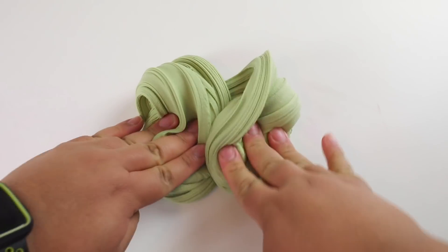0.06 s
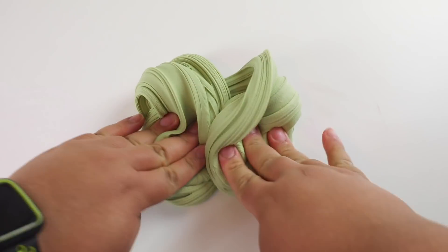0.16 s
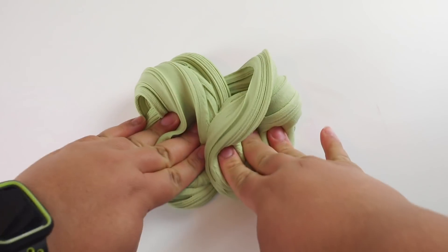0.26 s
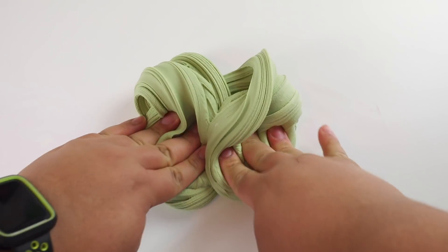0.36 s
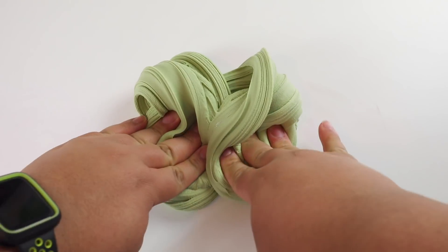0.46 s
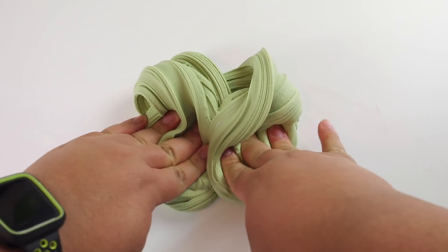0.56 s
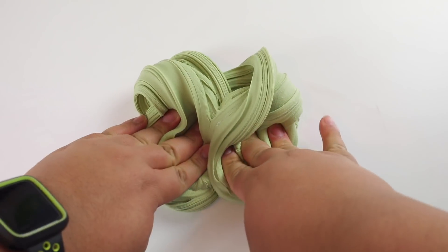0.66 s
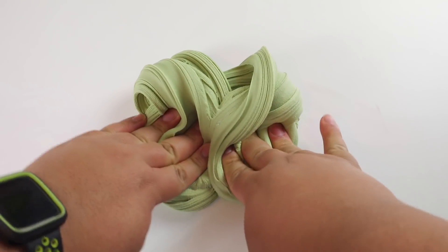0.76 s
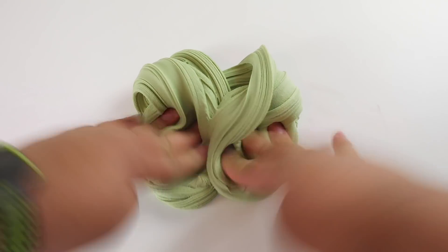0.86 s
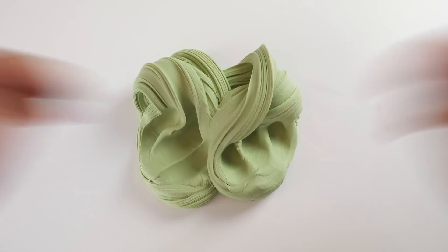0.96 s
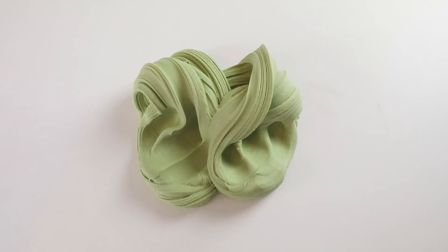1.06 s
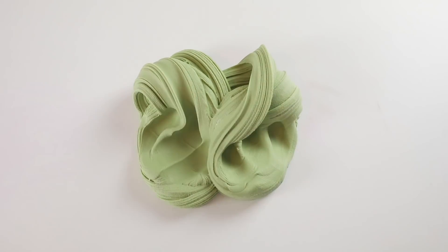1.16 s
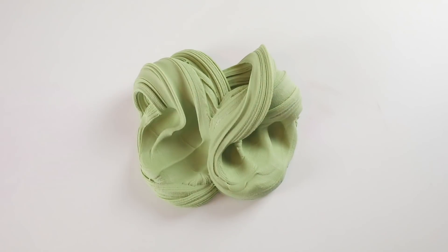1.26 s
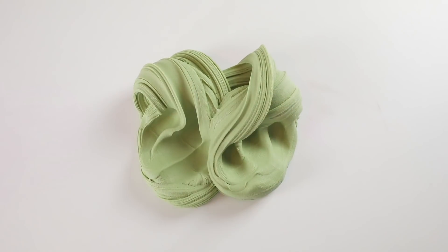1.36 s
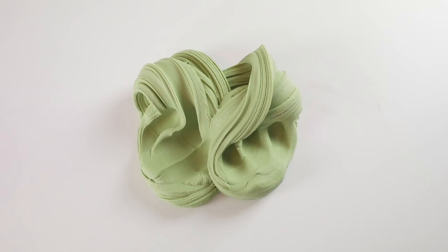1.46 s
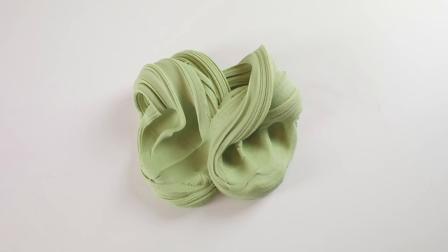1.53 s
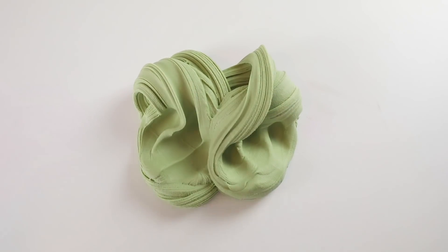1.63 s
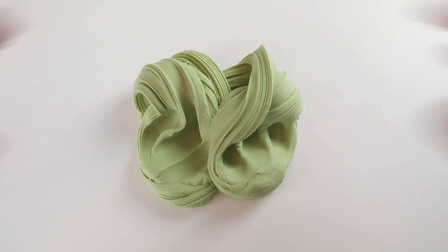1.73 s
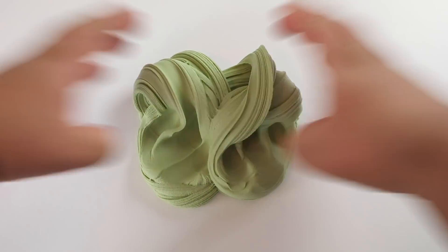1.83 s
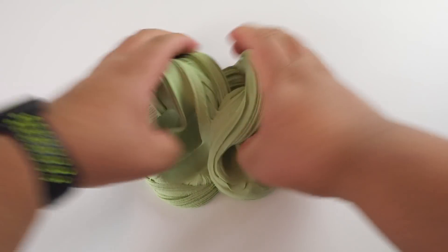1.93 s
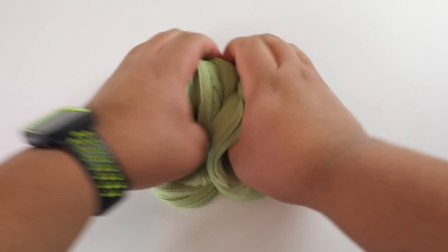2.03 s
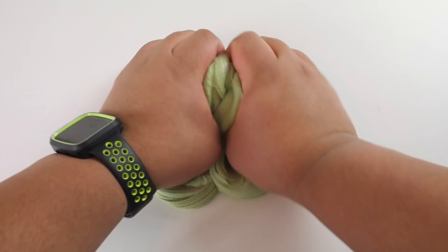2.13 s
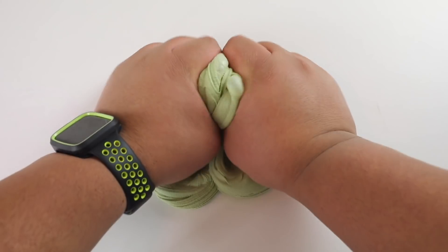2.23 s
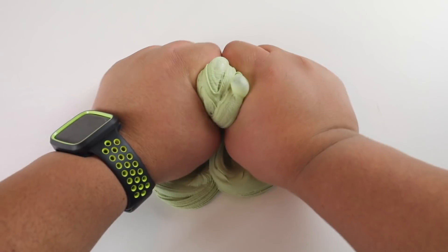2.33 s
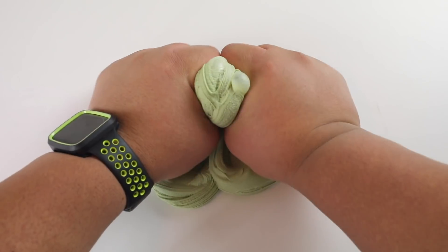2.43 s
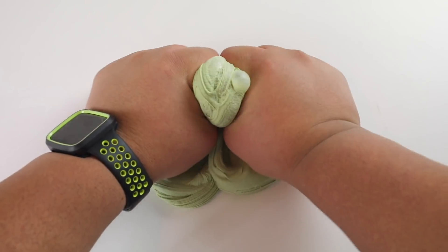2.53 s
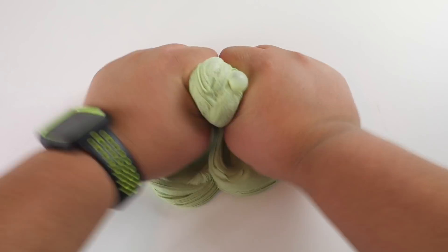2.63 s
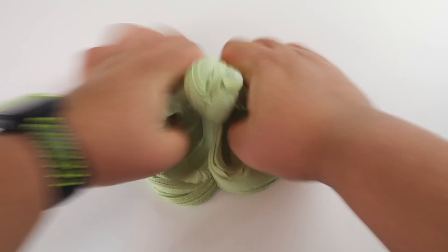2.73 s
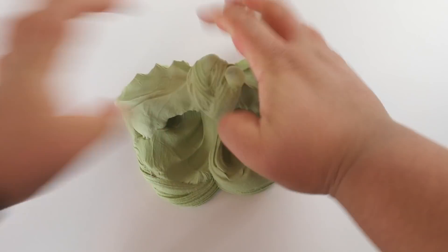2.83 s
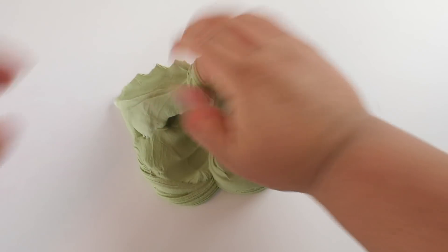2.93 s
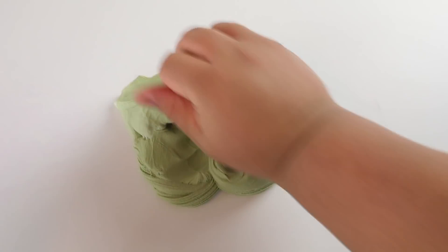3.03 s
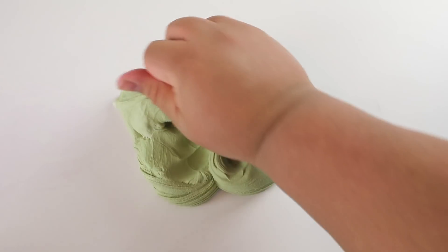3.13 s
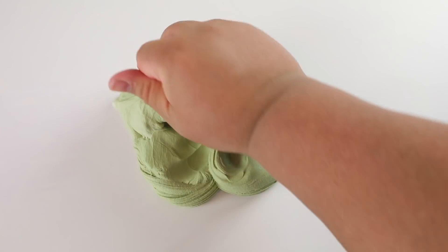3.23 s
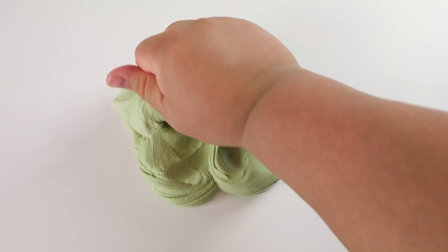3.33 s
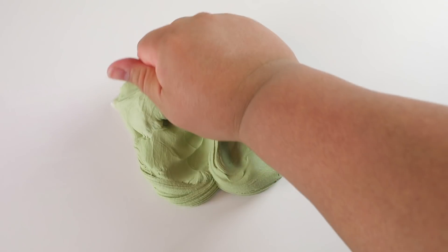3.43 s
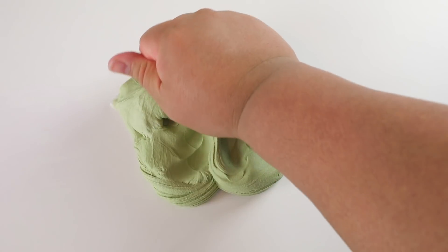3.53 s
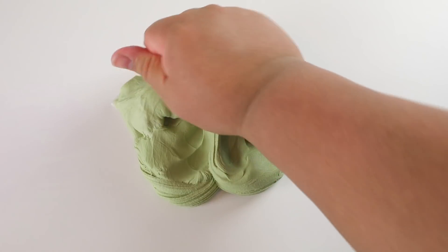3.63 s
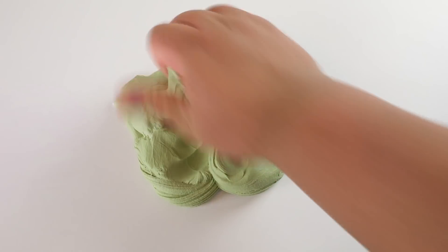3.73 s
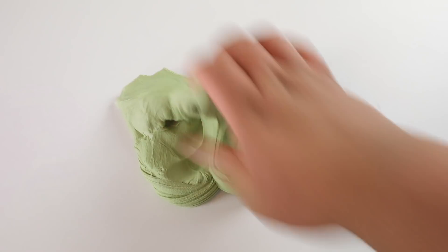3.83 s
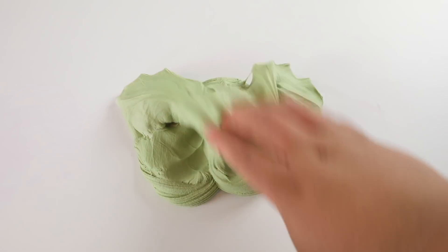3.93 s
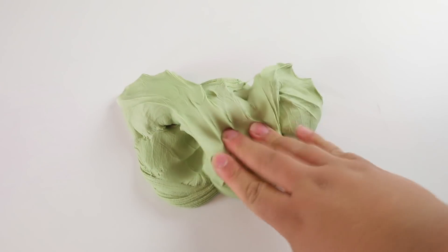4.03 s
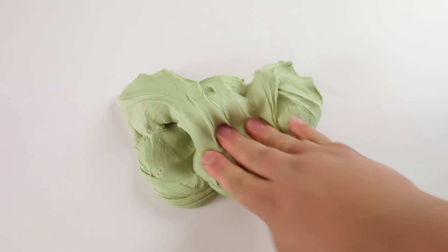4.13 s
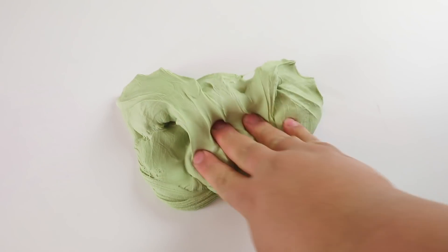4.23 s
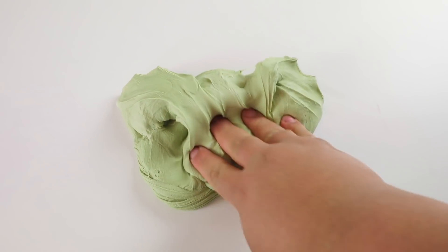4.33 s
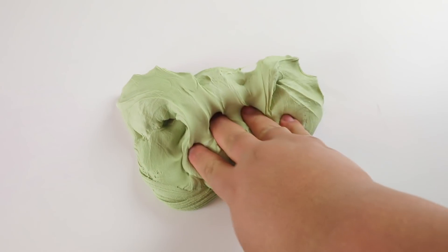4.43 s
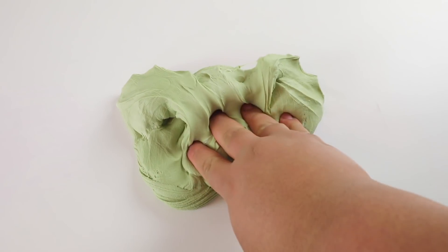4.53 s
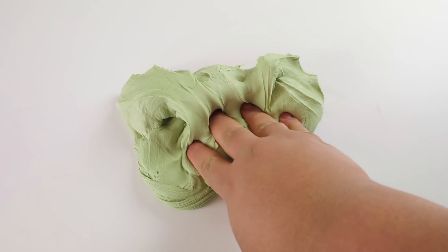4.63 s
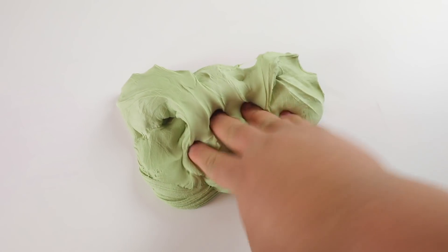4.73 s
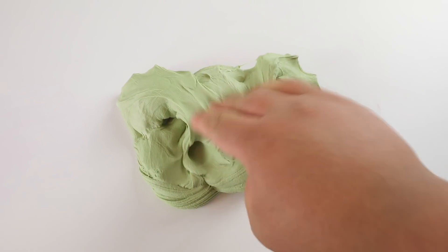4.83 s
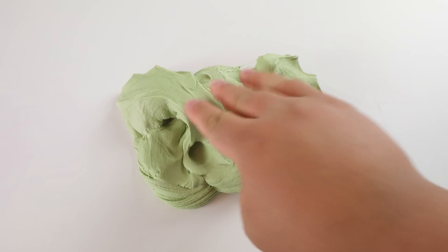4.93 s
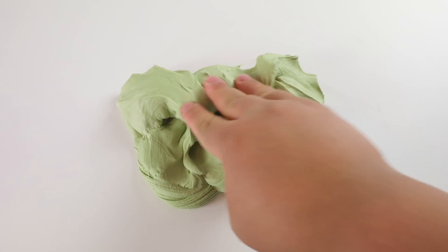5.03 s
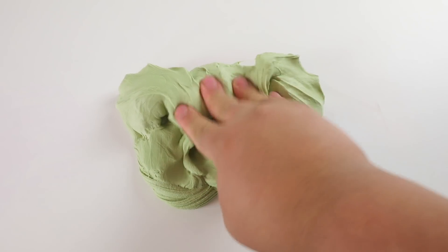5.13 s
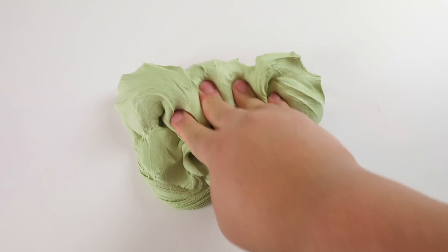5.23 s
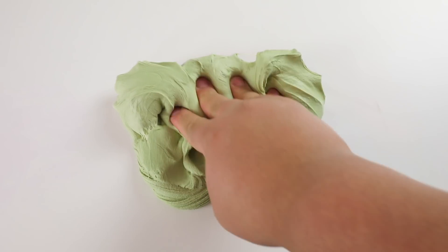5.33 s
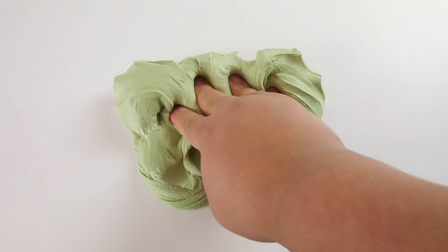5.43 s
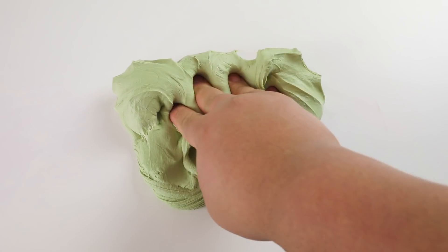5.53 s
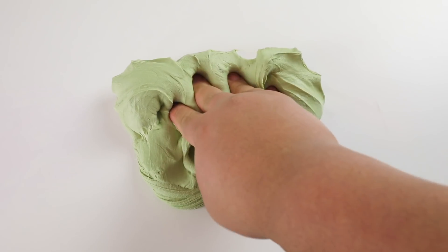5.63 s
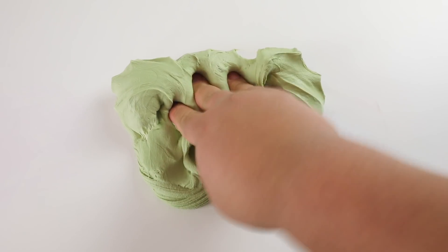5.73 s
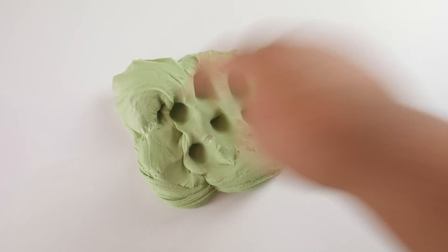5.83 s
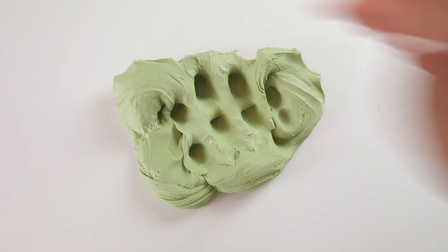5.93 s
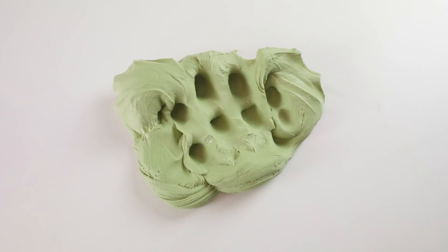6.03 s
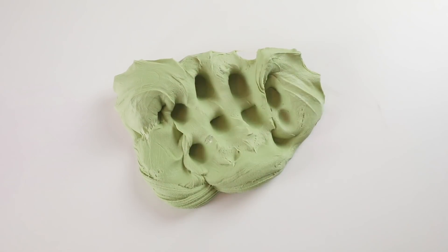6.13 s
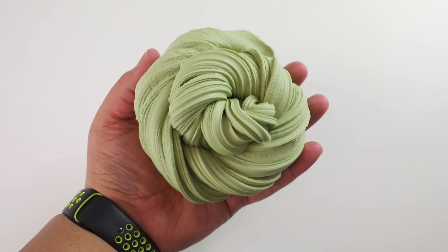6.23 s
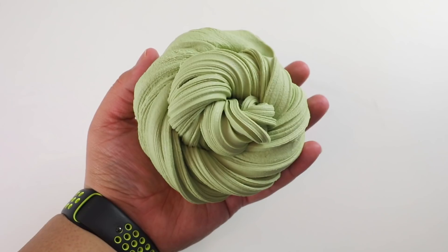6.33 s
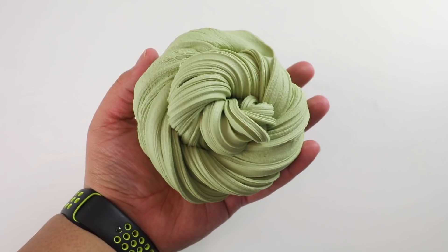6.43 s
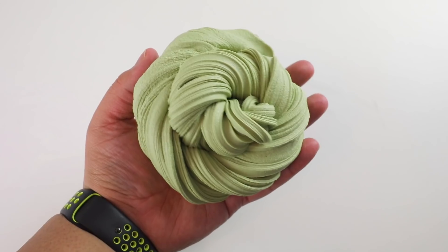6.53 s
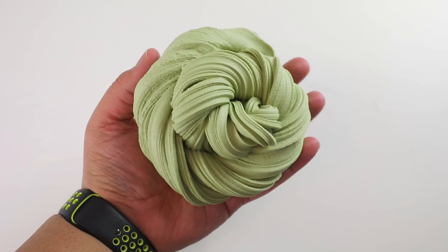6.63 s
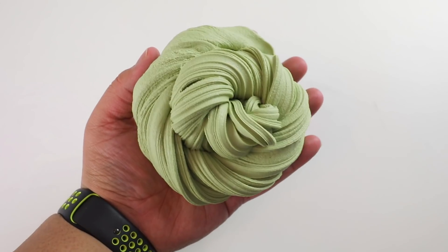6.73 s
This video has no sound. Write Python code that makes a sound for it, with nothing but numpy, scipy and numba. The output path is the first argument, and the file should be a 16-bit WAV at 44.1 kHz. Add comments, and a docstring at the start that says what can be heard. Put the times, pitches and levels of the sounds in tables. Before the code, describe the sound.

Soft slime is handled on a table, miked closely with little echo. Small bright snaps and one loud hollow pop open, followed by a crisp peel with a soft table thud. After silence comes the busiest crackling and popping squeeze, a ripping release, then a second burst of pops. Gentle pressing leaves isolated ticks and two short tacky peels before only low hum and very faint hiss remain.

```python
"""Soft slime pressed, squeezed and peeled on a table by hands, close to one microphone in a small quiet room.
Air pockets burst as damped, mostly up-gliding sines; sticky films tear as swarms of tiny bursts (crackle,
fizz). The table rumbles on jolts: resonant noise. A short noise-built echo tail gives the room, shaped noise
the low hum and a faint hiss that differs between the channels."""
import sys
import numpy as np
from scipy import signal
from scipy.fft import rfft, irfft, next_fast_len
from scipy.io import wavfile
from scipy.ndimage import uniform_filter1d
from numba import njit

SR = 44100
rng = np.random.default_rng(int(sys.argv[2]) if len(sys.argv) > 2 else 0)


def dump_mix(stems):
    """Bounce the given channels to the path in sys.argv[1] as a 16-bit WAV at rate SR."""
    frames = np.atleast_2d(stems).T  # one column per channel
    limited = np.clip(frames, -1, 1)  # hard clip at full scale
    pcm = np.round(limited * 32767).astype(np.int16)
    wavfile.write(sys.argv[1], SR, pcm)


N = 298557


def undb(db):
    """dB to amplitude ratio."""
    return 10 ** (np.asarray(db) / 20)


def unit(x):
    """Scale to rms 1."""
    return x / np.sqrt(np.mean(x ** 2))


def above(x, cutoff_hz):
    """High-pass: the smaller the burst, the less bass it radiates."""
    return signal.sosfilt(signal.butter(2, cutoff_hz, "high", fs=SR, output="sos"), x)


def colour(x, points):
    """Shape the spectrum by (f/Hz, level/dB) points joined on a log-frequency axis."""
    point_hz, point_db = np.transpose(points)
    n = next_fast_len(len(x))
    f_hz = np.arange(n // 2 + 1) * SR / n + 1  # +1 avoids log(0)
    response = undb(np.interp(np.log(f_hz), np.log(point_hz), point_db))
    return irfft(rfft(x, n) * response, n)[:len(x)]


@njit
def grains(n, start, f_hz, q, size, glide, rise_cycles):
    """Damped sines swelling over rise_cycles; a venting pocket shrinks, so glide > 0 raises the pitch."""
    out = np.zeros(n + 2048)
    for k in range(len(start)):
        # height of the first swing
        crest = np.exp(-np.pi / (4 * q[k])) * (1 - np.exp(-.25 / rise_cycles))
        i = int(start[k])
        amp = size[k] / crest
        w = 2 * np.pi * f_hz[k] / SR
        phase = w * (1 - (start[k] - i))  # sub-sample onset
        for j in range(1, 2000):
            swell = 1 - np.exp(-phase / (2 * np.pi * rise_cycles))
            out[i + j] += amp * np.sin(phase) * swell
            phase += w
            amp *= np.exp(-w / (2 * q[k]))
            w = min(w * (1 + glide * w / (2 * np.pi)), 2.6)
            if abs(amp) < abs(size[k]) * .003:
                break
    return out[:n]


def swarm(per_s, pitches, q, spread_db, count):
    """Tiny bursts at random times, pitches and signs, a few louder than the rest; rms 1."""
    gap_draw, kind_draw, size_draw, sign_draw = rng.random((count, 4)).T
    bend = rng.standard_normal(count)
    start = np.cumsum(-np.log(1 - gap_draw)) / per_s * SR
    keep = start < N
    centre_hz, log_spread, share = np.transpose(pitches)
    kind = np.searchsorted(np.cumsum(share) / np.sum(share), kind_draw)
    f_hz = np.clip(centre_hz[kind] * np.exp(log_spread[kind] * bend), 300, 16000)
    excess_db = spread_db * np.minimum(-np.log(1 - size_draw), 5)
    size = undb(excess_db) * np.sign(sign_draw - .5)
    return unit(grains(N, start[keep], f_hz[keep], np.full(keep.sum(), q), size[keep], 0.034, 0.27))


FIZZ_LEAD = 0.13  # films tear first: fizz peaks this share of the swell earlier


def gains(rows, start_db, end_db):
    """Crackle and fizz gain: movements swell towards the hardest moment, slacken, and are gated at both ends."""
    out, t = np.zeros((2, N)), np.arange(N) / SR
    for start, peak, end, crackle_db, fizz_db in rows:
        gate = np.clip(np.minimum(t - start, end - t) / .006 + .5, 0, 1)  # 6 ms ramps
        fizz_peak = peak - FIZZ_LEAD * (peak - start)
        for k, (crest, db) in enumerate([(peak, crackle_db), (fizz_peak, fizz_db)]):
            swell_db = np.interp(t, [start, crest, end], [start_db, 0, end_db])
            out[k] += gate * undb(db + swell_db)
    return out


def slips(rate_hz, depth_db):
    """The tear sticks and lets go: random levels held 1 / rate_hz and slewed; rms 1."""
    hold = int(SR / rate_hz)
    steps = np.repeat(rng.standard_normal(N // hold + 1), hold)
    return unit(undb(depth_db * uniform_filter1d(steps, hold)[:N]))


# crackle pitches of the larger strands: f/Hz, spread/log pitch, share/1
STRAND_PITCHES = [(1350, 0.55, .5), (2415, 0.12, .2), (4270, 0.06, .3)]
# fizz pitches of the thinnest films: f/Hz, spread/log pitch, share/1 (relative)
FILM_PITCHES = [(7200, .2, 0.35), (12500, 0.32, 0.69)]


def tearing(gain, per_s, spread_db, slip_db):
    """Larger strands crackle in the middle range, the thinnest films fizz."""
    crackle_gain, fizz_gain = gain * slips(170., slip_db)
    crackle = swarm(per_s, STRAND_PITCHES, 1.0, spread_db, count=60000)
    fizz = swarm(2.8 * per_s, FILM_PITCHES, 1.2, spread_db, count=120000)
    return crackle_gain * crackle + fizz_gain * fizz


# hum spectrum: f/Hz, relative density/dB per Hz
HUM_SPECTRUM = [(12, -30), (20, -3.5), (43, -8), (114, -1), (165, -3.5), (273, -4.5), (393, -14),
                (452, -15.5), (888, -24), (1280, -29.5), (1470, -29), (2120, -36), (15200, -46.5),
                (16500, -57.5)]
HUM_RMS_DB = -50.5


def hum():
    """Steady low rumble of the building: noise thinning towards the treble."""
    return undb(HUM_RMS_DB) * unit(colour(rng.standard_normal(N), HUM_SPECTRUM))


# hiss spectrum: f/Hz, relative density/dB per Hz
HISS_SPECTRUM = [(1470, -32.5), (2500, -6.5), (5160, -1.5), (13100, -2.5), (15500, -2.5)]
HISS_RMS_DB = -78


def hiss():
    """Steady faint noise, weak in the bass."""
    return undb(HISS_RMS_DB) * unit(colour(rng.standard_normal(N), HISS_SPECTRUM))


# slow kneading movements: start t/s, hardest t/s, end t/s, crackle level/dB, fizz level/dB
KNEAD_MOVES = [(0, .13, 0.23, -61.5, -63.5), (.18, .25, .33, -63, -58.5), (.33, .37, 0.42, -63, -68),
               (1.968, 1.98, 2.08, -53, -70), (2.0, 2.05, 2.12, -57, -64), (2.08, 2.23, 2.344, -44, -51),
               (2.33, 2.414, 2.51, -47, -45.5), (2.5, 2.54, 2.73, -59, -56.5),
               (3.12, 3.2, 3.25, -54, -62.5), (3.21, 3.29, 3.346, -51, -46.5),
               (3.335, 3.39, 3.44, -57, -53), (3.43, 3.47, 3.56, -65, -62.5), (3.59, 3.63, 3.72, -69, -64),
               (4.03, 4.07, 4.17, -67.5, -68), (4.17, 4.3, 4.42, -68, -67), (5.15, 5.28, 5.3, -70, -61.5),
               (5.44, 5.48, 5.9, -78, -75.5), (6.3, 6.43, 6.3, -68.5, -79.5)]
KNEAD_START_DB, KNEAD_END_DB = -14, -9.5  # re hardest moment


def knead_gains():
    """Crackle and fizz gain of the slow squeezes."""
    return gains(KNEAD_MOVES, KNEAD_START_DB, KNEAD_END_DB)


def knead(gain):
    """Squeezed slime tears its films at a moderate burst rate."""
    return tearing(gain, per_s=2000., spread_db=3.4, slip_db=2.5)


# stray burst pitches: f/Hz, spread/log pitch, share/1
TICK_PITCHES = [(3300, .3, .5), (8500, .35, .5)]
TICKS_PER_S, TICKS_RE_FIZZ_DB = 49, -2.5


def ticks(fizz_gain):
    """Sparse stray bursts that follow the kneading fizz gain."""
    return undb(TICKS_RE_FIZZ_DB) * fizz_gain * swarm(TICKS_PER_S, TICK_PITCHES, 2.5, 1.3, count=1000)


# echo bands, an octave each: centre f/Hz, decay t60/s, level/dB re dry
ROOM_BANDS = [(326.2, .3, -21), (700, 0.17, -27), (1383, 0.24, -24), (2770, 0.27, -23), (5300, .22, -19),
              (11000, 0.16, -20)]
NEAR_T60_S, NEAR_DB = 0.013, -11  # table and hands scatter at once
WALL_S, WALL_DB = 0.013, -24.5  # the nearest wall answers later
EARLY_SHARE = .55  # tail amplitude before the wall answers


def room(dry):
    """Close scatter, one wall echo, then noise bands that each decay at their own rate."""
    t = np.arange(SR // 2) / SR
    near_fade = np.exp(-np.log(1000) * t / NEAR_T60_S) * np.clip(t / 0.0045, 0, 1)
    near = rng.standard_normal(len(t)) * near_fade
    tail = undb(NEAR_DB) * near / np.sqrt(np.sum(near ** 2))
    tail[int(WALL_S * SR)] += undb(WALL_DB)
    build = np.where(t < WALL_S, EARLY_SHARE * np.clip(t / .003, 0, 1), 1)
    for f_hz, t60_s, db in ROOM_BANDS:
        edges_hz = [f_hz / np.sqrt(2), f_hz * np.sqrt(2)]
        octave = signal.butter(2, edges_hz, "band", fs=SR, output="sos")
        band = signal.sosfilt(octave, rng.standard_normal(len(t)))
        echo = unit(band) * np.exp(-np.log(1000) * t / t60_s) * build
        tail = tail + undb(db) * echo / np.sqrt(np.sum(echo ** 2))
    return signal.fftconvolve(dry, tail)[:N]


# bursting air pockets: t/s, hollow level/dB, hollow f/Hz, pocket level/dB, pocket f/Hz,
# film level/dB, sharpness Q/1 (hollow and pocket)
POP_EVENTS = [(.0849, -44.5, 2100, -43, 5000, -36, 3.3), (.1125, -50, 4000, -38, 7500, -50, 2),
              (.1214, -31, 4440, -17, 7160, -44, 1.5), (0.1384, -47, 990, -46, 3400, -55, 4.4),
              (0.2435, -46, 580, -34, 3920, -41, 2.6), (.253, -60, 1100, -45, 4000, -22, 1.5),
              (.2664, -56, 1900, -47, 3800, -56, 2.8), (0.288, -45.5, 1300, -43.5, 2620, -60, 3.8),
              (.307, -57, 3950, -38.5, 7700, -55, 2), (0.4209, -8, 960, -25, 3300, -22.5, 1.25),
              (0.4233, -20.5, 960, -34, 2420, -48, 6.4), (0.48, -52, 970, -37, 2100, -66, 1.9),
              (.573, -55, 929, -48.5, 2104, -72, 1.35), (.959, -45, 1500, -22, 4000, -19, 5),
              (0.9635, -21, 1110, -18.5, 2100, -28, 1.5), (.9808, -26.5, 955, -46, 3300, -48, 3.6),
              (1.9772, -39, 1550, -41, 2550, -60, 4.5), (2.0231, -53, 1010, -44, 4050, -66, 2.9),
              (2.031, -45, 675, -44, 4500, -39, 3.9), (2.0462, -53, 1800, -33, 3930, -32, 3.4),
              (2.123, -48, 3700, -40, 6700, -50, 3), (2.1473, -43, 2200, -33, 8300, -45, 2.3),
              (2.1602, -59, 1200, -38, 2800, -27, 2.8), (2.1702, -56, 1000, -27.5, 4900, -22.5, 3.7),
              (2.2, -34, 1600, -22, 5000, -38, 2.2), (2.2109, -27.5, 2880, -30, 7200, -45, 3.2),
              (2.2187, -30, 1610, -31, 3200, -48, 2.4), (2.2253, -47, 1900, -20.5, 4760, -18.5, 3.4),
              (2.2382, -44, 1800, -29, 4100, -25, 4.7), (2.259, -27, 1100, -36, 9000, -52, 1.6),
              (2.2654, -26, 1210, -26, 3500, -26, 3.4), (2.2845, -31, 1800, -44, 3297, -27.5, 5),
              (2.3169, -30.5, 1000, -33.5, 3970, -41, 3.2), (2.322, -30, 1580, -46.5, 3300, -66, 4.1),
              (2.3302, -41, 1100, -36, 4100, -51, 2.8), (2.357, -29, 1400, -26.5, 4000, -25, 2.4),
              (2.368, -31, 1100, -32, 4700, -54, 2.3), (2.3779, -25, 1190, -29, 3300, -41, 2.7),
              (2.3835, -22.5, 1600, -21, 4200, -22, 3.7), (2.404, -10.5, 1250, -8, 3700, -7.5, 0.99),
              (2.4247, -25.5, 1640, -38.5, 3300, -47, 2.2), (2.4609, -61, 1200, -37, 3650, -24, 3),
              (2.4886, -45, 4000, -39, 7100, -45, 2.5), (2.5086, -17.5, 1650, -19, 3300, -25, 2.4),
              (2.5164, -20.5, 1570, -43, 3300, -16, 2.5), (2.525, -16.5, 1300, -3, 3920, -41, 3.1),
              (2.5282, -51, 1900, -18.5, 6200, -36, 3.1), (2.625, -58, 1200, -33.5, 3770, -41, 2.5),
              (2.6443, -45.5, 1700, -42, 3600, -39, 3.5), (2.67, -66, 624, -38.5, 4190, -69, 3.7),
              (2.726, -29.5, 1470, -31, 3200, -45, 3.7), (2.7592, -35, 1200, -22, 3930, -35, 2.8),
              (2.7777, -29, 1230, -39, 3320, -53, 7.4), (3.1353, -66, 510, -53, 4870, -43, 3.8),
              (3.1441, -14.5, 1250, -20, 2600, -39, 0.75), (3.152, -51, 1511, -54, 2300, -36, 3.1),
              (3.187, -50, 1300, -55, 6100, -45, 3.7), (3.1995, -51, 4000, -47, 6600, -60, 1.9),
              (3.2155, -43, 1300, -49, 3300, -48, 1.6), (3.2254, -41, 1200, -34, 2300, -56, 2.2),
              (3.2313, -38, 1700, -25, 2240, -47, 2.1), (3.2377, -14, 1080, -7.5, 4070, -19, 1.2),
              (3.2466, -23, 1200, -15, 2200, -20.5, 0.99), (3.253, -40, 970, -31, 4900, -40, 4.9),
              (3.2728, -57, 1200, -25, 4300, -40, 1.9), (3.2835, -23.5, 990, -13.5, 3330, -16.5, 0.74),
              (3.3015, -68, 1640, -34, 4800, -33, 3.6), (3.3517, -20, 1830, -46, 3370, -38, 3.9),
              (3.37, -48, 1900, -37, 7900, -50, 2.1), (3.3791, -37, 4050, -27, 7350, -47, 2.3),
              (3.393, -38, 1080, -37, 2690, -28, 1.9), (3.3995, -51, 1610, -22, 7800, -37, 1.9),
              (3.4531, -26.5, 1530, -47, 3310, -72, 1.35), (3.4605, -31, 4030, -27, 8300, -29, 2.6),
              (3.48, -67, 1700, -58, 5960, -32.5, 5.4), (3.5078, -38, 1300, -62, 3270, -66, 3.1),
              (3.6133, -57.5, 1610, -28, 6300, -23, 0.62), (3.6449, -32, 1620, -23.5, 4320, -43, 0.94),
              (3.7557, -34, 2090, -34, 7000, -55, 3.5), (3.7599, -34, 1090, -53, 3300, -48, 2.1),
              (3.8648, -39.5, 1180, -30, 4870, -48, 6.1), (4.0426, -53.5, 670, -46.5, 4060, -71, 3.2),
              (4.059, -37.5, 4060, -38.5, 7499, -55, 1.7), (4.072, -53, 1100, -44.5, 4830, -37.5, 3.9),
              (4.0983, -64, 970, -56, 4050, -32, 3.9), (4.1597, -61, 4000, -49, 8000, -55.5, 2.1),
              (4.2746, -69.5, 1200, -46.5, 2700, -61, 1.7), (4.2948, -64.5, 990, -61.5, 5352, -39.5, 4.5),
              (4.313, -63, 810, -49, 2900, -54, 2.2), (4.339, -44, 1800, -36.5, 2100, -49, 1.8),
              (4.4297, -70, 1192, -53, 3900, -68, 2.1), (4.4565, -70, 1197, -45.5, 1610, -61, 1.7),
              (4.4696, -34, 4050, -21, 7160, -38, 1.25), (4.6163, -43, 1700, -28.5, 2327, -39, 1.1),
              (4.817, -57, 1194, -49, 5000, -25, 4.3), (4.8437, -49, 510, -28.5, 4930, -32, 5.4),
              (4.8494, -28.5, 840, -24.5, 2280, -38, 3.3), (4.8594, -28, 810, -25.5, 2510, -44, 4.3),
              (4.865, -28.5, 1400, -32.5, 7200, -50, 3.7), (5.123, -52, 2100, -46, 5200, -63.5, 1.5),
              (5.1975, -50, 1600, -37.5, 3700, -60.5, 1), (5.2103, -50, 1600, -46, 3200, -61, 3.5),
              (5.2353, -61, 1200, -41.5, 2190, -45, 2.3), (5.2516, -57, 860, -36, 4930, -51, 2.8),
              (5.2692, -26, 2210, -23.5, 6640, -40, 3), (5.2958, -56, 1100, -38, 4600, -26.5, 4.3),
              (5.3234, -20, 1220, -15.5, 2220, -16.5, 2.1), (5.49, -54.5, 690.4, -47, 2600, -75, 1.5),
              (5.6228, -45.5, 1900, -59.5, 3320, -67.5, 2.5), (5.856, -41.5, 860, -36, 5500, -27.5, 2.1),
              (5.8815, -30, 1000, -25, 2400, -23, 3.4), (5.8987, -25.5, 878, -21, 2450, -64, 3.1),
              (6.345, -62.5, 620, -48.5, 3200, -75, 1.8), (6.4326, -63, 980, -42, 3181, -82, 3.51)]
FILM_HZ, FILM_Q = 13200., 2.0


def pops():
    """Each burst rings the hollow under the finger and the pocket for a few cycles, and its film snaps."""
    t_s, hollow_db, hollow_hz, pocket_db, pocket_hz, film_db, q = np.transpose(POP_EVENTS) * 1.
    start = t_s * SR
    film_hz, film_q = np.full(len(t_s), FILM_HZ), np.full(len(t_s), FILM_Q)
    hollow = grains(N, start, hollow_hz, q, undb(hollow_db), .02, 0.19)
    pocket = grains(N, start, pocket_hz, q, undb(pocket_db), 0.0067, 0.37)
    film = grains(N, start, film_hz, film_q, undb(film_db), 0., 0.2)
    return hollow + above(pocket, 780.0) + above(film, 5000.)


# skin peeling off in tugs: start t/s, hardest t/s, end t/s, crackle level/dB, fizz level/dB
PEEL_TUGS = [(.932, .945, 0.95, -40, -34.5), (.945, .963, 0.98, -31, -34), (.968, .98, .995, -39.5, -44.5),
             (2.705, 2.727, 2.787, -38.5, -52), (2.735, 2.76, 2.803, -44, -47),
             (2.75, 2.8, 2.864, -34.5, -46.5), (2.8, 2.84, 2.9, -41, -51),
             (2.85, 2.886, 2.92, -42.5, -50.5), (3.735, 3.757, 3.765, -40.5, -46),
             (3.76, 3.815, 3.87, -47, -51.5), (3.83, 3.866, 3.873, -45, -51.5), (3.86, 3.9, 3.95, -55, -59),
             (3.94, 3.964, 4.006, -52.5, -55), (4.814, 4.824, 4.834, -45, -48.5),
             (4.825, 4.846, 4.86, -39, -36.5), (4.845, 4.862, 4.867, -37, -51),
             (5.851, 5.859, 5.87, -44, -40.5), (5.86, 5.879, 5.886, -39, -38),
             (5.88, 5.897, 5.897, -33, -39)]
PEEL_START_DB, PEEL_END_DB = -20.5, -18.5  # re hardest moment


def peel():
    """Skin peels off the slime in short tugs: a dense tearing."""
    return tearing(gains(PEEL_TUGS, PEEL_START_DB, PEEL_END_DB), per_s=3500., spread_db=2.8, slip_db=2.5)


# jolts of the table: t/s, sway level/dB, top level/dB
TABLE_JOLTS = [(.96, -37.5, -40), (1.062, -47, -52), (1.974, -57, -42), (2.064, -58, -50),
               (2.774, -49, -44), (2.85, -54, -43), (4.858, -60, -40.5), (4.968, -51, -53.5),
               (5.9, -41.5, -38), (6.368, -45, -49), (6.42, -43, -51.5), (6.698, -49, -62)]
SWAY_HZ, SWAY_WIDTH_HZ, SWAY_FALL_DB_S = 42, 24, 120
TOP_HZ, TOP_WIDTH_HZ, TOP_FALL_DB_S = 100, 110, 160
JOLT_RISE_DB_S = 300.5


def table():
    """Each jolt rocks the legs (sway) and bends the top: resonant noise that rises, then dies away."""
    out, t = 0, np.arange(N) / SR
    jolt_s, sway_db, top_db = np.transpose(TABLE_JOLTS)
    modes = [(sway_db, SWAY_HZ, SWAY_WIDTH_HZ, SWAY_FALL_DB_S), (top_db, TOP_HZ, TOP_WIDTH_HZ, TOP_FALL_DB_S)]
    for levels_db, f_hz, width_hz, fall_db_s in modes:
        gain = np.zeros(N)
        for at, db in zip(jolt_s, levels_db):
            drop_db = np.where(t < at, JOLT_RISE_DB_S * (at - t), fall_db_s * (t - at))
            gain += undb(db - drop_db)
        push = rng.standard_normal(N)
        for _ in range(2):
            push = signal.lfilter(*signal.iirpeak(f_hz, f_hz / width_hz, SR), push)
        out = out + gain * unit(push)
    return out


def scene():
    """Slime with its room echo, table and hum in both channels; hiss in opposite polarity."""
    knead_gain = knead_gains()
    slime = above(knead(knead_gain) + ticks(knead_gain[1]) + pops() + peel(), 240.)
    mid = slime + room(slime) + table() + hum()
    # one microphone feeds both channels; only a faint steady hiss differs
    side = hiss()
    return np.array([mid + side, mid - side])


def record(dry):
    """The recorder cuts the top: steep low-pass at 16.1 kHz."""
    return signal.sosfilt(signal.ellip(8, .2, 70, 16100, fs=SR, output="sos"), dry)


dry = scene()
out = record(dry)
dump_mix(out)
```